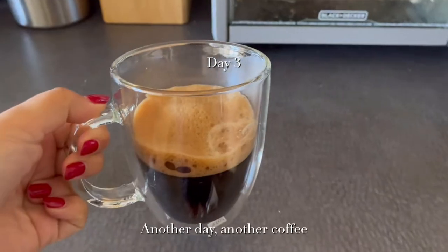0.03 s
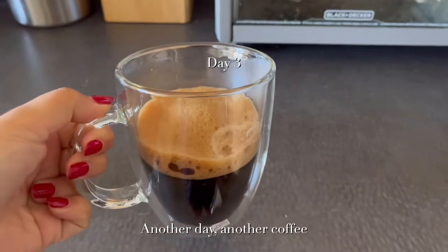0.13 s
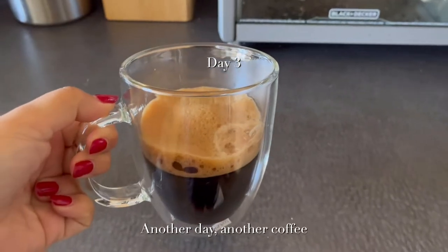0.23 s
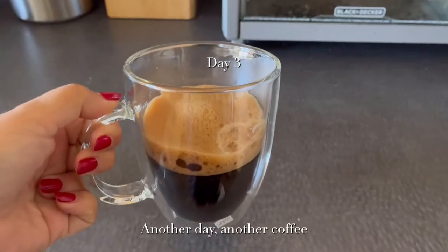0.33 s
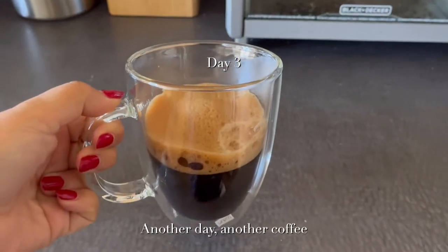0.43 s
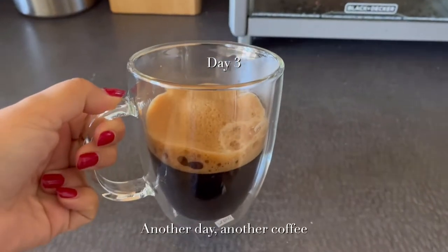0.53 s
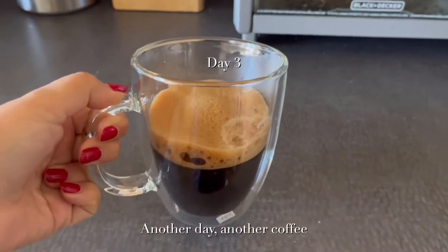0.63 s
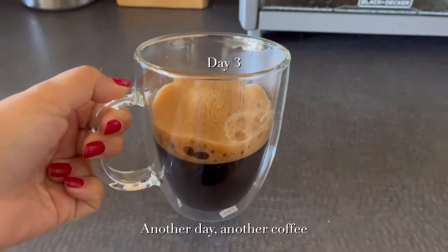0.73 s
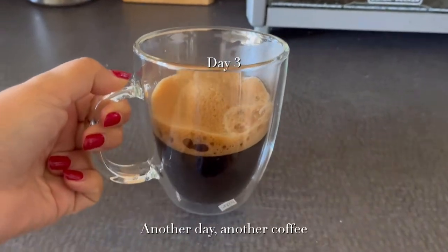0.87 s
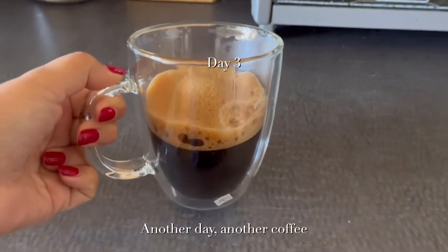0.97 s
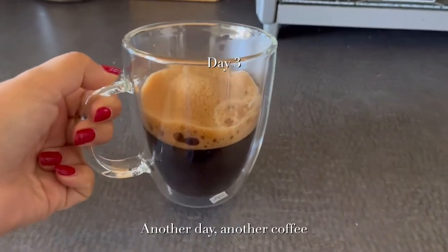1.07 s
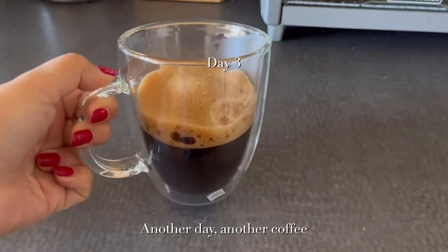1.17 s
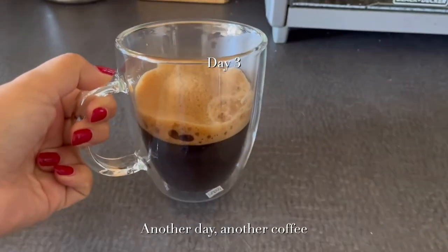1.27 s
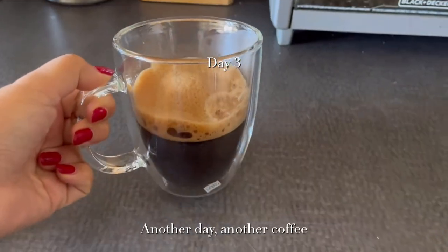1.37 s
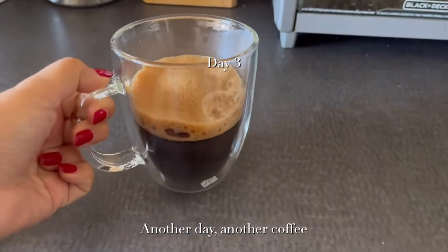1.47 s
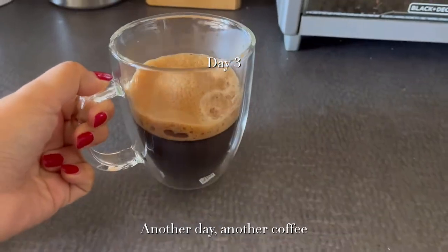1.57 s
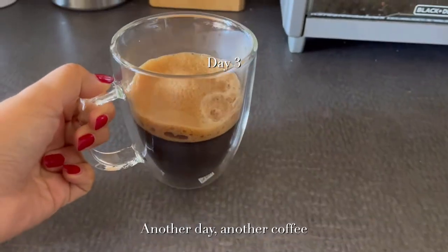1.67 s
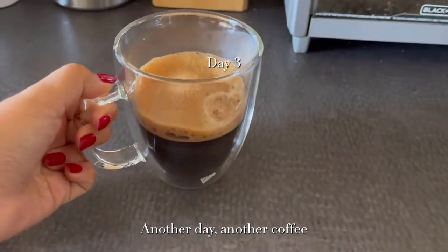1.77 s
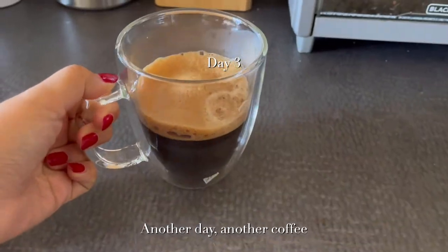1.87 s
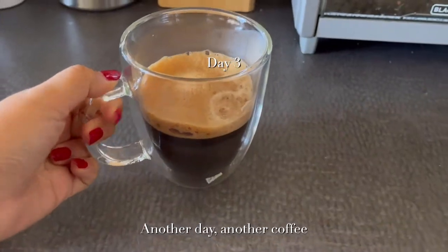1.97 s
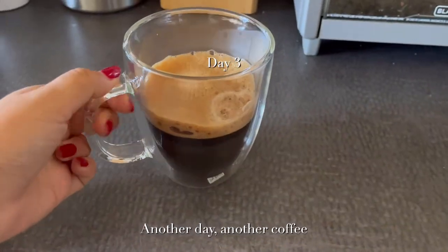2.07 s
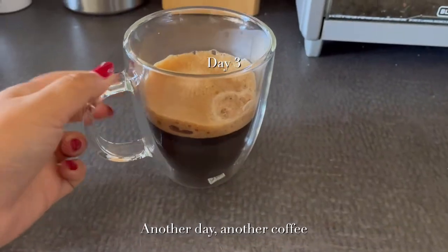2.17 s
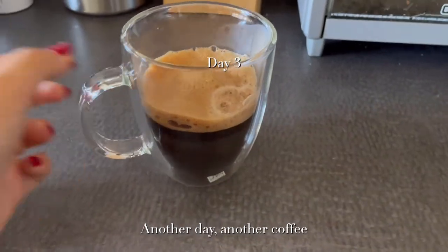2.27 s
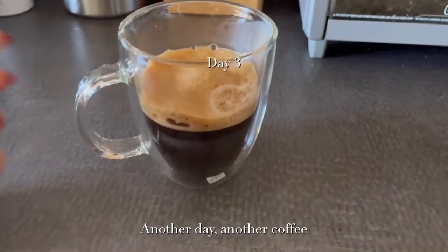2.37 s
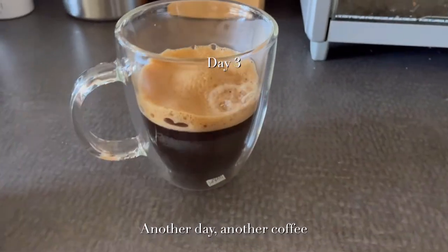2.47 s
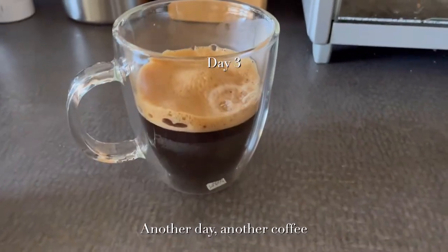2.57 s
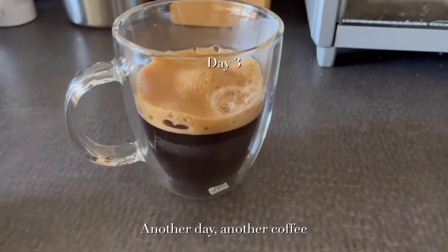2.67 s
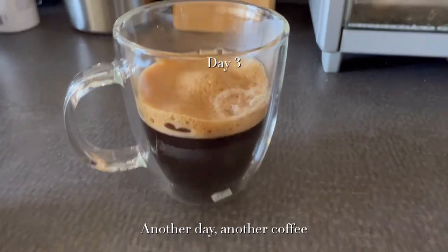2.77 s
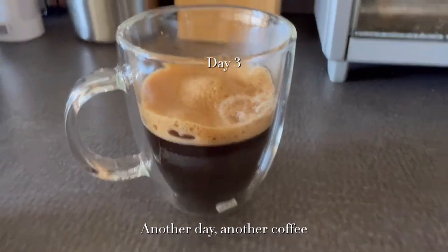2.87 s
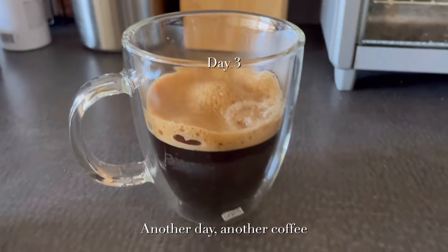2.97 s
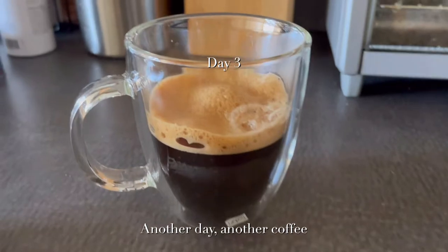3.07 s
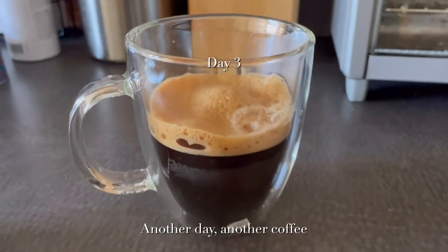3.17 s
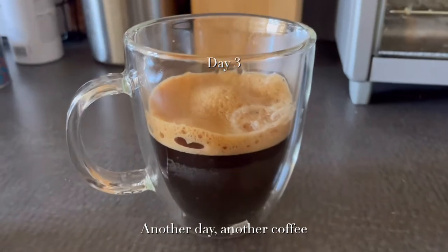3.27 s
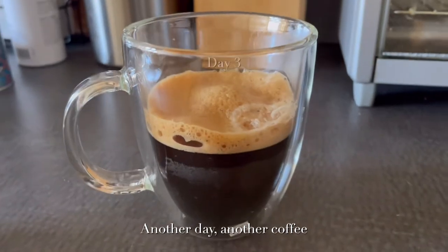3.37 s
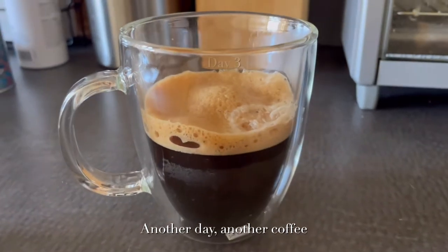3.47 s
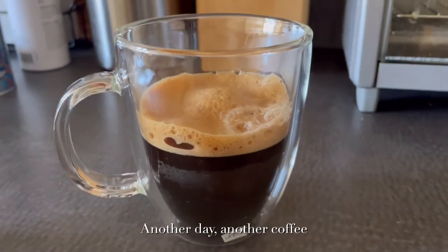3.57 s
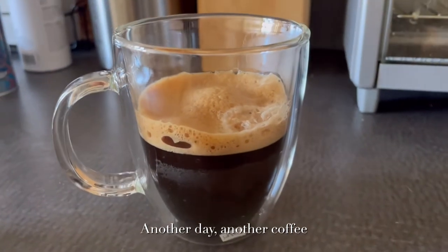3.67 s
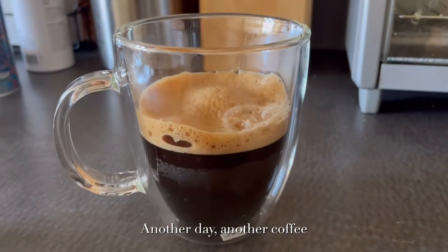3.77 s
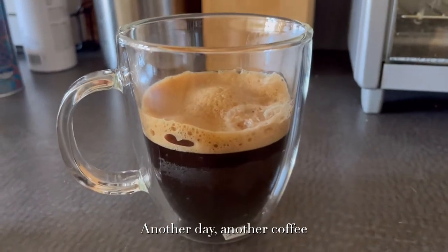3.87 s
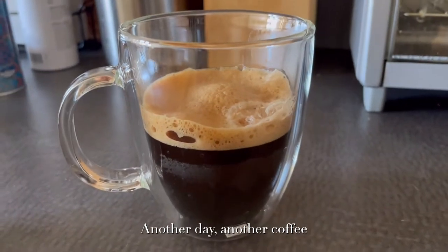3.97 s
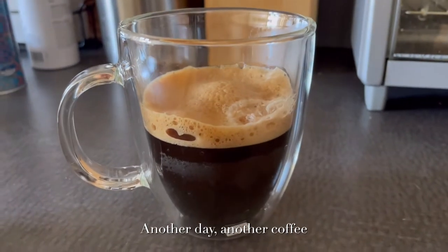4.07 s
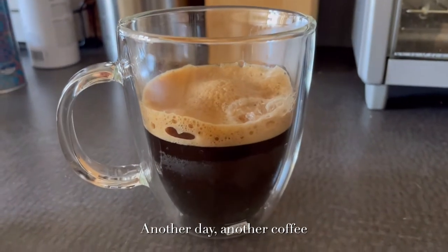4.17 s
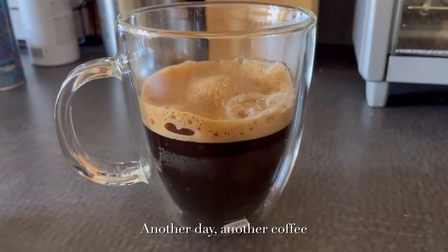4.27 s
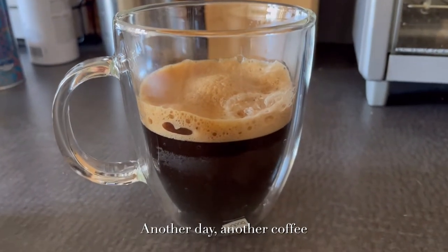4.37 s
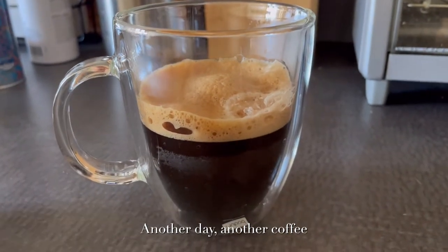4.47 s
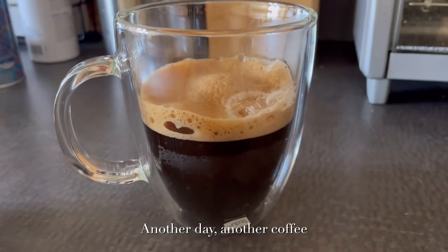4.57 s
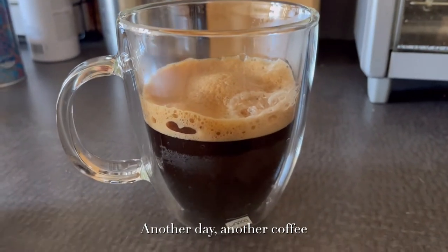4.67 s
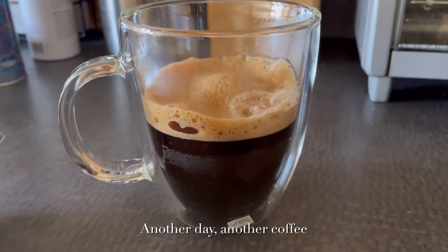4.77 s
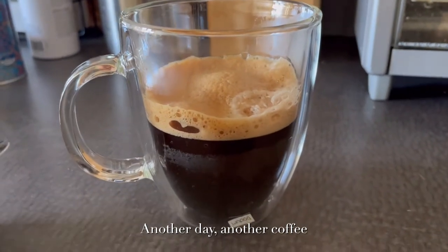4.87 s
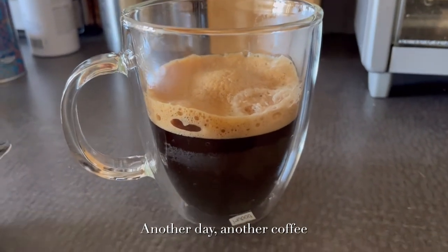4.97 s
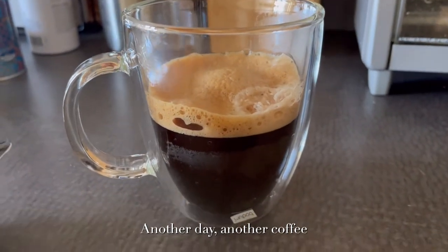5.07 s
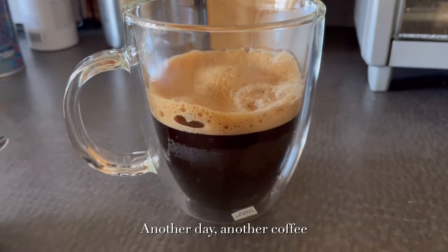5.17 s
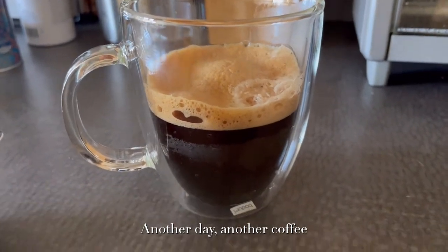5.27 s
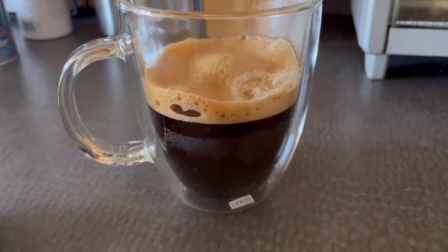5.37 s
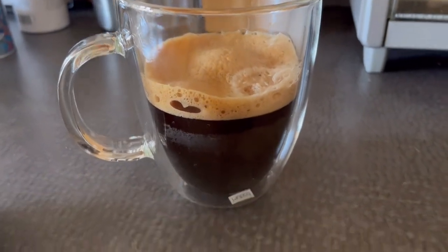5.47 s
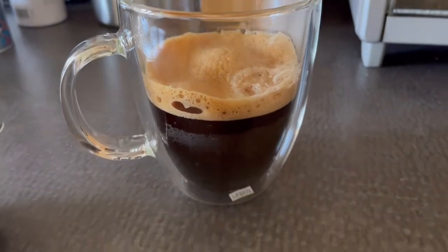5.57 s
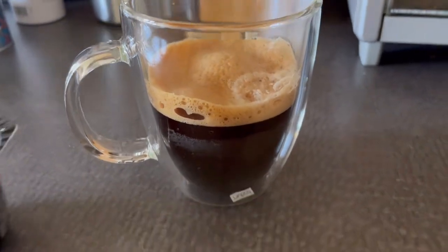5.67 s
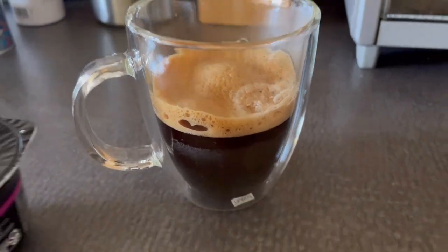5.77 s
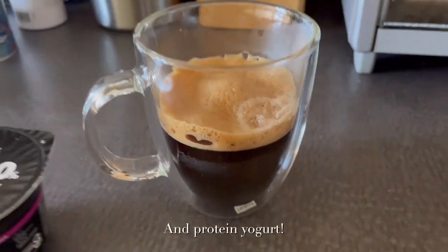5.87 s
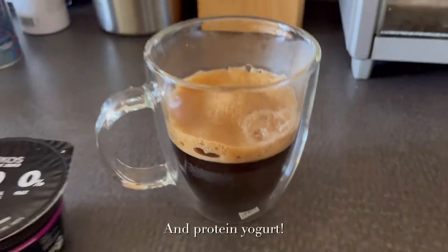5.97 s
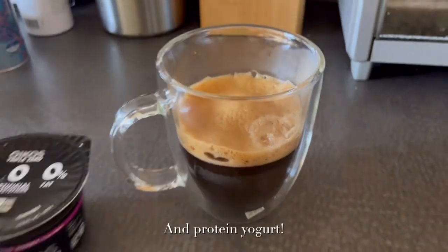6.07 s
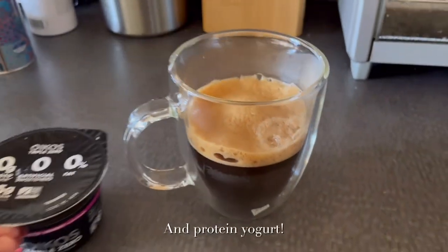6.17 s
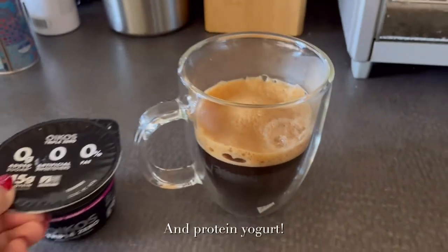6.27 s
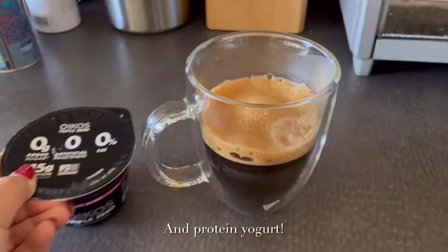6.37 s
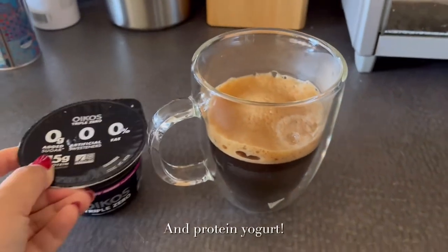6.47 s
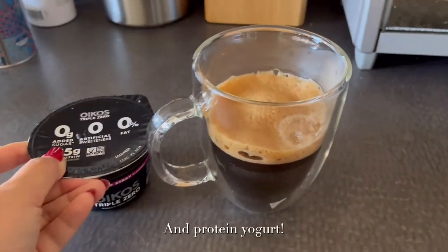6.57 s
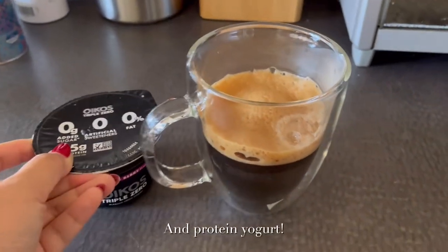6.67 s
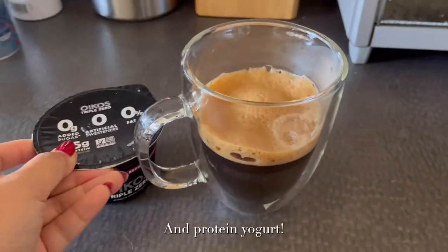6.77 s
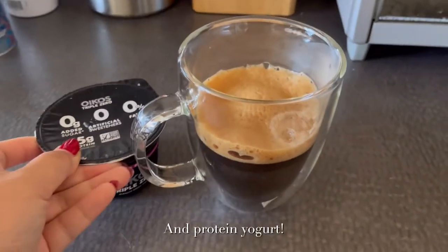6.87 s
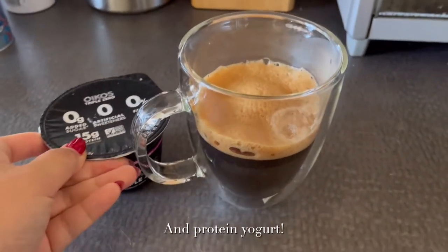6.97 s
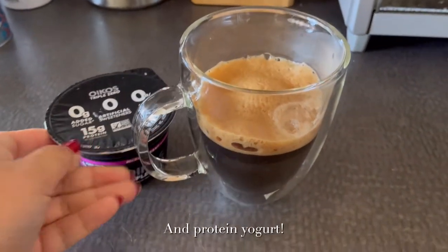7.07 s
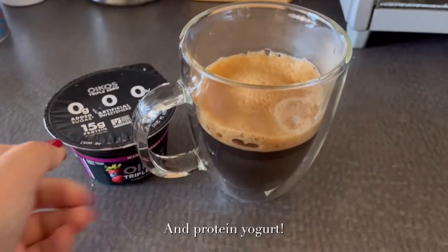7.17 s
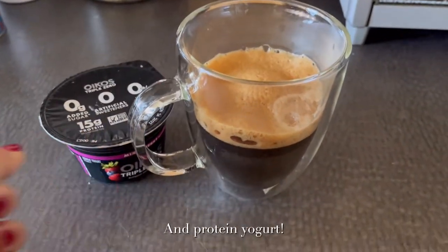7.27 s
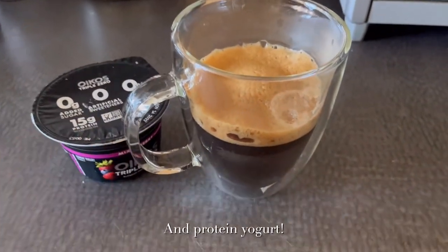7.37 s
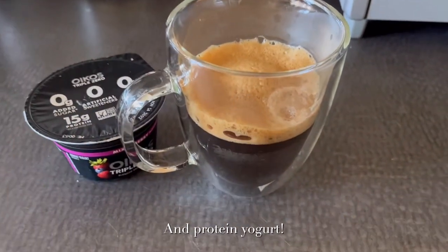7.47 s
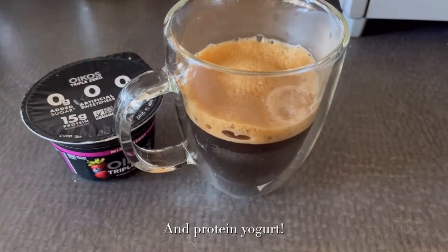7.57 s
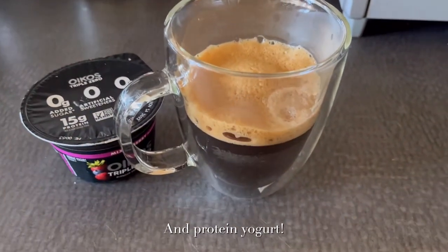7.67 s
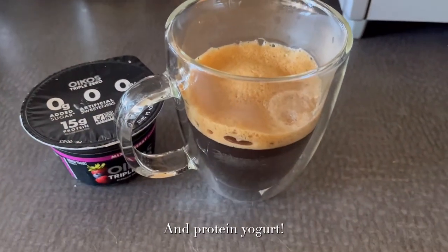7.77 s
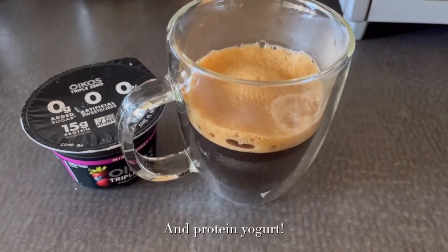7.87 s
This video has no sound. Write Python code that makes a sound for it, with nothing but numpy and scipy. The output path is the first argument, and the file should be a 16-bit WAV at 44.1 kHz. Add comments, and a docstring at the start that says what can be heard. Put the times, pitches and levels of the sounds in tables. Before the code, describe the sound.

Close up in a humming kitchen, a heavy glass clunks and scrapes over the counter, followed by hollow plastic taps and dry little scuffs.

```python
"""Mug and yogurt cup on a kitchen counter

A double-walled glass mug of coffee is set down close to a microphone pair, pushed over the textured counter
and let down flat; then a plastic yogurt cup comes up from the left, scuffing and tapping.
Glass, counter and cup are sets of dying sines; scrapes and scuffs are trains of tiny random slips, filtered.
A refrigerator hums as wavering sines over filtered noise, and a small, hard room answers the near sounds."""
import sys
import numpy as np
from scipy import signal
from scipy.fft import rfft, irfft
from scipy.io import wavfile
from scipy.ndimage import uniform_filter1d

SR = 44100
rng = np.random.default_rng(int(sys.argv[2]) if len(sys.argv) > 2 else 0)


def wav_out(sig):
    """Save sig, one row per channel (or a flat mono array), as 16-bit PCM at SR to the path in sys.argv[1]."""
    wavfile.write(sys.argv[1], SR, np.round(np.clip(np.atleast_2d(sig).T, -1, 1) * 32767).astype(np.int16))


N = 348719
TIME = np.arange(N) / SR  # s
RING = np.arange(SR // 2) / SR  # s, time axis of one short sound


def amp(db):
    """Decibels to gain."""
    return 10 ** (np.asarray(db) / 20)


def evened(x):
    """Scales to rms 1."""
    return x / np.sqrt(np.mean(x ** 2) + 1e-20)


def peaked(x):
    """Scales to peak 1."""
    return x / abs(x).max()


def read(points, hz):
    """Reads a spectrum table on a log-frequency axis."""
    f, value = np.transpose(points)
    return np.interp(np.log(hz + 1), np.log(f + 1), value)


def levels(rows):
    """Smoothed gain curves from rows of (t/s, level/dB, ..), silent outside them."""
    s, *columns = np.transpose(rows)
    curves = [amp(np.interp(TIME, s, column, left=-200, right=-200)) for column in columns]
    return [uniform_filter1d(curve, size=256).clip(0) for curve in curves]


def add(mix, s, sound):
    """Lays a stereo sound into the mix at time s."""
    part = mix[:, round(s * SR):][:, :sound.shape[-1]]
    part += sound[..., :part.shape[1]]


def cut(x, hz, kind, order=2):
    """Butterworth low-pass or high-pass."""
    return signal.sosfilt(signal.butter(order, min(hz, SR / 2 - 100), kind, fs=SR, output="sos"), x)


def through(x, response):
    """Plays a pair of signals through an impulse response."""
    return signal.oaconvolve(x, np.atleast_2d(response), axes=1)[:, :x.shape[1]]


def colour(x, spectrum):
    """Causal, minimum-phase filter with the given spectrum."""
    log_gain = np.log(amp(read(spectrum, abs(np.fft.fftfreq(4096, 1 / SR)))))
    taps = np.fft.ifft(np.exp(np.conj(signal.hilbert(log_gain)))).real
    return through(x, taps)


def widen(pair, side):
    """Turns two signals into mid and side of a left-right pair, the side filtered."""
    difference = colour(pair[1:], side)[0]
    return np.array([pair[0] + difference, pair[0] - difference])


def balance(left_db):
    """Gains that raise the left channel and lower the right one by left_db."""
    return amp([[left_db], [-left_db]])


def fall(t60):
    """Decay that drops 60 dB in t60 seconds, over the length of RING."""
    return np.exp(-np.log(1000) * RING / t60)


def ring(modes, low_db=0, low_hz=220, hold=1):
    """Dying sines of a struck body; low_db weights the modes under low_hz, hold scales their ring time."""
    return sum(amp(db + low_db * (hz < low_hz)) * np.sin(2 * np.pi * hz * RING) * fall(t60 * hold)
               for hz, db, t60 in modes)


def burst(decay):
    """A pair of noise puffs of energy 1 that fall to 1/e in decay seconds."""
    puff = rng.standard_normal((2, len(RING))) * np.exp(-RING / decay)
    return puff / np.linalg.norm(puff, axis=1, keepdims=True)


def grains(per_s, spread_db):
    """Two trains of tiny slips of random time, sign and size."""
    size = amp(spread_db * np.minimum(rng.exponential(1, (2, N)), 4))
    sign = rng.choice([-1, 1], (2, N))
    return evened(size * sign * (rng.random((2, N)) < per_s / SR))


def drift(per_s):
    """A slow random curve of rms 1, its rate limited by a Gaussian low-pass."""
    steps = np.linspace(0, TIME[-1], 4096)
    smooth = np.exp(-(np.fft.rfftfreq(len(steps), steps[1]) / per_s) ** 2)
    curve = irfft(rfft(rng.standard_normal(len(steps))) * smooth)
    return np.interp(TIME, steps, evened(curve))


def disperse(x, delay):
    """Bending waves in a slab or wall: treble runs ahead of bass; delay/s is the travel time at 400 Hz."""
    hz = np.fft.rfftfreq(len(x), 1 / SR)
    return irfft(rfft(x) * np.exp(-4j * np.pi * delay * np.sqrt(400 * hz)), len(x))


def resonate(x, hz, width_hz):
    """A steep resonance that follows the curve hz."""
    turn = np.exp(2j * np.pi * np.cumsum(hz) / SR)
    r = np.exp(-np.pi * width_hz / SR)
    return (turn * signal.lfilter([(1 - r) ** 2], [1, -2 * r, r * r], x / turn + 1e-18)).real


# ring time of the small, hard kitchen: f/Hz, t60/s
ROOM_T60 = [(100, 0.54), (400, 0.45), (1000, 0.6), (3000, 0.34), (7000, 0.27), (14000, 0.14)]


def kitchen(x, near_db, tail_db, near_decay=0.014):
    """Quick reflections from counter, wall and appliances, then the room's tail; the bass stays central."""
    hz, t, z = signal.stft(rng.standard_normal((2, len(RING))), SR, nperseg=256)
    dying = z * np.exp(-np.log(1000) * t / read(ROOM_T60, hz)[:, None])
    tail = signal.istft(dying, SR, nperseg=256)[1][:, :len(RING)]
    echoes = amp(tail_db) * tail / np.linalg.norm(tail[0]) + amp(near_db) * burst(near_decay)
    echoes = widen(echoes, [(100, -14.5), (300, -3.0), (800, 2.0)]) / np.sqrt(2)
    return x + through(x, np.pad(echoes, ((0, 0), (64, 0))))


# shape of the room's murmur: f/Hz, level/dB
AIR_SHAPE = [(15, -51), (25, -16.5), (50, -2), (95, 1), (153, -7.5), (236, -4), (305, -9), (490, -17),
             (1100, -32.5), (1225, -33), (1330, -34.5), (1480, -37), (2050, -48.5), (5500, -53.5),
             (8500, -66.5), (12500, -53.5), (14500, -63), (16000, -80.5)]
# stereo width of the murmur: f/Hz, side minus mid/dB
AIR_WIDTH = [(60, -18), (110, -15), (200, -11), (380, -2.5), (700, 2.5), (1290, -1), (2380, 1), (4400, -4),
             (8120, 7), (15000, -14)]
# steady lines of the refrigerator: f/Hz, rms level/dB
FRIDGE_LINES = [(59.2, -62.5), (236.9, -80), (296.1, -61), (716.0, -87), (1007, -79), (1184, -78),
                (1228, -82), (3440, -105)]


def room_tone(air_db=-52, waver=0.13, right_phase=0.45):
    """Background: filtered noise as air, with phase-wavering sines as the refrigerator."""
    air = amp(air_db) * evened(widen(colour(rng.standard_normal((2, N)), AIR_SHAPE), AIR_WIDTH))
    lead = np.array([[0], [right_phase]])  # rad between left and right at 300 Hz, in proportion elsewhere
    hum = sum(amp(db) * np.sin(2 * np.pi * hz * TIME + waver * drift(3.43) + lead * hz / 300)
              for hz, db in FRIDGE_LINES)
    return air + np.sqrt(2) * hum


# soft low bumps of handling: t/s, envelope peak/dB, f/Hz, swell time/s
HANDLING_BUMPS = [(3.338, -41.5, 55, 0.019), (5.589, -46.5, 58, 0.11), (5.915, -33.5, 84, .014),
                  (6.268, -60, 173, 0.0092), (7.122, -43.5, 110, 0.0081)]


def bumps():
    """Dull pushes: low sines that swell and die away."""
    out = np.zeros((2, N))
    for s, db, hz, swell in HANDLING_BUMPS:
        envelope = RING / swell * np.exp(1 - RING / swell)
        add(out, s, amp(db) * envelope * np.sin(2 * np.pi * hz * RING))
    return out


# the slab booms as the foot crosses its middle: t/s, rms level/dB, time from crest to 1/e on either side/s
BOOM_SWELLS = [(1.452, -36, 0.033), (1.663, -41.5, 0.015)]


def slab_boom(slab_hz=258, waver=0.79):
    """One resonance of the counter, kept going by the sliding foot: a phase-wavering sine."""
    gain = sum(amp(db) * np.exp(-((TIME - s) / half) ** 2) for s, db, half in BOOM_SWELLS)
    return gain * np.sqrt(2) * np.sin(2 * np.pi * slab_hz * TIME + waver * drift(12))


# fingernails leave the handle: t/s, brush peak/dB, tink above the brush/dB
NAIL_BRUSHES = [(1.957, -67.5, 4.5), (2.086, -56, 2.5), (2.134, -53, -15)]
# nail on glass: f/Hz, level/dB
NAIL_COLOUR = [(1500, -2), (3400, -13), (4300, -2), (5200, -8), (7000, -15), (8500, -31), (11000, 0),
               (14000, -6.5), (16000, -34)]
# the glass handle, damped by the fingers: f/Hz, level/dB, t60/s
HANDLE_MODES = [(4340, 0, 0.018), (5900, -6, 0.01), (6780, -10, 0.012)]


def nails(decay=0.011):
    """Light brushes of fingernails, as noise puffs, make the glass handle tink."""
    out = np.zeros((2, N))
    for s, db, tink_db in NAIL_BRUSHES:
        brush = peaked(colour(burst(decay), NAIL_COLOUR))
        add(out, s, amp(db) * (brush + amp(tink_db) * peaked(ring(HANDLE_MODES))))
    return kitchen(out, near_db=-3, tail_db=-9)


# the mug's glass: f/Hz, level/dB, t60/s
GLASS_MODES = [(1451, -11, 0.17), (1520, -6, 0.029), (1886, -7.5, .05), (2114, -1.5, 0.024),
               (2650, -2.5, 0.029), (3154, -21, 0.011), (3490, -10, 0.022), (3634, -1, 0.027),
               (3650, -5, 0.024), (5460, -14.5, 0.019), (6800, -9, 0.02), (6725, -0.5, 0.031)]
ROLL_DB, ROLL_PER_S = 2.5, 25  # swelling and fading of each mode as the contact travels round the foot
ROLL_DETUNE = 0.013  # the travelling contact also pulls each mode off pitch by this rms share


def glass_chatter(catches, sliding):
    """Catches of the foot ring the glass; its modes shift in strength and pitch as the contact travels."""
    out = np.zeros((2, N))
    for hz, db, t60 in GLASS_MODES:
        mode_hz = hz * (1 + ROLL_DETUNE * drift(ROLL_PER_S)[sliding])
        turn = np.exp(2j * np.pi * np.cumsum(mode_hz) / SR)
        drive = catches[:, sliding] * amp(db + ROLL_DB * drift(ROLL_PER_S)[sliding])
        decay = np.exp(-np.log(1000) / (t60 * SR))
        out[:, sliding] += (turn * signal.lfilter([1], [1, -decay], drive / turn)).imag
    return out


# one push slides the mug: t/s, scrape level before the layer trims/dB
MUG_PUSH = [(1.215, -67.5), (1.25, -65.5), (1.31, -62), (1.345, -53), (1.385, -50.5), (1.606, -56.5),
            (1.654, -71), (1.755, -74.5), (1.79, -72)]
# counter shaken by the foot: f/Hz, level/dB
RUMBLE_SHAPE = [(26, -41.5), (45, -9), (119, -0.5), (226, -1), (258, 6), (286, -5.5), (321, 0.5),
                (431, 0.5), (537, -11.5), (631, -24), (710, -18), (938, -24), (1190, -59), (1500, -27.5),
                (1950, -76.5), (3300, -120)]
# fine grit under the foot: f/Hz, level/dB
GRIT_SHAPE = [(700, 12), (1300, 1.5), (2300, -2.5), (3200, -1.5), (3900, -1), (4600, -19), (5400, -8.5),
              (6300, -3.5), (7400, -29), (8200, -37), (10500, -9.5), (14000, -26), (16000, -47)]
# stereo width of rumble and grit: f/Hz, side minus mid/dB
MUG_WIDTH = [(60, -34), (110, -24.5), (200, -9), (380, -28.5), (700, -4), (1290, 7), (2380, -1), (4400, -3),
             (8120, -3), (15000, 5)]
RUMBLE_FOLLOWS, GRIT_FOLLOWS = 0.57, 0.74  # dB of rumble and of grit per dB of scrape
RUMBLE_FADE_DB_PER_S = 16  # the counter shakes less as the mug moves off
SLOW_RIDGES_HZ, FAST_RIDGES_HZ = 77.9, 196  # texture ridges under the foot, before and after it speeds up
SPEED_UP_AT_S, SPEED_UP_S = 1.375, 0.11
CHATTER_DB = 4.2  # the foot's catches come in clumps


def mug_slide(ridge_db=-7, rumble_db=-1, glass_db=2.0, grit_db=-12.0, wander=0.0298, left_db=1.5, grip=0.41):
    """The foot bumps over ridges that shake the counter; fine grit hisses, coarser catches ring the glass."""
    push, = levels(MUG_PUSH)
    start, end = MUG_PUSH[0][0], MUG_PUSH[-1][0]
    rumble_gain = push ** RUMBLE_FOLLOWS * amp(-RUMBLE_FADE_DB_PER_S * np.maximum(TIME - start, 0))

    speed = .5 + .5 * np.tanh((TIME - SPEED_UP_AT_S) / SPEED_UP_S)
    ridge_hz = SLOW_RIDGES_HZ + (FAST_RIDGES_HZ - SLOW_RIDGES_HZ) * speed
    turns = np.cumsum(ridge_hz * (1 + wander * drift(25))) / SR
    ridges = evened(sum(np.cos(2 * np.pi * k * turns) / k for k in range(1, 4)))
    rumble = evened(widen(colour(grains(900, spread_db=-3.0), RUMBLE_SHAPE), MUG_WIDTH))
    shaking = rumble_gain * (amp(rumble_db) * rumble + amp(ridge_db) * ridges)

    pressure = 1 + grip * np.cos(2 * np.pi * turns)  # each ridge presses the foot
    catches = grains(420, spread_db=2) * amp(CHATTER_DB * drift(100)) * pressure
    sliding = (TIME > start) & (TIME < end)
    glass = cut(cut(glass_chatter(catches, sliding), 1400, "high"), 6800, "low", order=6)
    glass = evened(glass) * np.sqrt(sliding.mean())  # rms 1 while sliding
    slips = grains(4100, spread_db=0.5) * pressure * amp(2.6 * drift(70))
    grit = evened(widen(colour(slips, GRIT_SHAPE), MUG_WIDTH))
    scrape = amp(glass_db) * push * glass + amp(grit_db) * push ** GRIT_FOLLOWS * grit
    return kitchen(scrape * balance(left_db) + shaking, near_db=-4.5, tail_db=-10.5)


# the foot sticks and slips free, most of all while still slow: t/s, peak before the trim/dB
FOOT_SLIPS = [(1.2206, -44), (1.2575, -51), (1.2644, -49), (1.2804, -50), (1.2865, -40), (1.2964, -41),
              (1.3094, -36.5), (1.3244, -44), (1.3444, -46), (1.3633, -54), (1.3748, -32.5), (1.3904, -39),
              (1.5673, -40), (1.7439, -66)]
# the counter slab and the cabinet under it: f/Hz, level/dB, t60/s
COUNTER_MODES = [(85, -5.5, .2), (108, -6, .13), (129, -12, .12), (199, -16, .13), (232, -18, .13),
                 (260, -8, .14), (322, -8, .06), (355, -0.5, .055), (386, 2, .07), (435, -4, .035),
                 (526, -13, .09), (690, -11, .05), (770, -15, .04), (918, -20, .06)]


def mug_catches(catch_db=-1, crack_db=-5, jolt_db=3, travel=0.00474):
    """Each slip of the foot pings the glass and jolts the counter."""
    out = np.zeros((2, N))
    jolt = peaked(disperse(cut(ring(COUNTER_MODES), 180, "high"), travel))
    for s, db in FOOT_SLIPS:
        crack = peaked(colour(burst(0.0015), GRIT_SHAPE))
        ping = peaked(cut(peaked(ring(GLASS_MODES)) + amp(crack_db) * crack, 7200, "low", order=7))
        add(out, s, amp(db + catch_db) * (ping + amp(jolt_db) * jolt))
    return kitchen(out, near_db=-11, tail_db=-8)


# the mug's foot meets the counter: t/s, clink level before left-right balance/dB, thud peak/dB,
# clink low-pass f/Hz, weight on the lowest counter modes/dB,
# share of ring time left to the glass (little once it stands flat)
FOOT_KNOCKS = [(1.0981, -28, -10.5, 12000, 5, 1), (1.1984, -33, -16.5, 10900, 6.5, 1),
               (1.8008, -35.5, -17.5, 1500, -0.5, .2), (1.864, -60, -36, 1100, -11, .2)]
# glass on laminate: f/Hz, level/dB
CRACK_COLOUR = [(200, -55.5), (600, 14.5), (1200, 13), (2400, 7.5), (4000, -6), (5200, -6), (7000, -54),
                (9000, -17), (15000, -11.5)]


def mug_knocks(crack_db=-2, crack_decay=0.0041, travel=0.00451, thud_hz=750, left_db=2):
    """The rim touches and clinks; the blow runs through the counter and arrives as a thud."""
    clinks, thuds = np.zeros((2, 2, N))
    for s, clink_db, thud_db, bright_hz, low_db, hold in FOOT_KNOCKS:
        crack = peaked(colour(burst(crack_decay), CRACK_COLOUR))
        clink = peaked(ring(GLASS_MODES, hold=hold)) + amp(crack_db) * crack
        clink = peaked(cut(clink, bright_hz, "low"))
        add(clinks, s, amp(clink_db) * clink * balance(left_db))
        thud = cut(cut(ring(COUNTER_MODES, low_db), thud_hz, "low"), 120, "high")
        add(thuds, s, amp(thud_db) * peaked(disperse(thud, travel)))
    return kitchen(clinks, near_db=-29.5, tail_db=-11.0) + kitchen(thuds, near_db=-4.5, tail_db=-11.5)


SHOVE_ATTACK_S, SHOVE_RELEASE_S = 0.04, 0.044  # longest attack and the release, as time constants
JERK_SHARE = 0.33  # a short shove is a jerk: its attack takes at most this share of its length


def shove(start, length):
    """Attack, hold and release of one movement of cup or hand."""
    early = np.maximum(start - TIME, 0)
    late = np.maximum(TIME - start - length, 0)
    attack = min(SHOVE_ATTACK_S, JERK_SHARE * length)
    return np.exp(-np.minimum(early / attack + late / SHOVE_RELEASE_S, 20))


# fingertips slide off the cup: start t/s, length/s, level/dB
HAND_LEAVES = [(7.15, 0.04, -64), (7.456, 0.13, -82.5)]
# skin on plastic: f/Hz, level/dB
SKIN_COLOUR = [(1500, -30), (3000, -1), (4700, 3), (6200, -6), (8000, -26), (16000, -41)]


def finger_slips():
    """A soft, broad hiss of dense slips as the hand lets go."""
    gain = sum(amp(db) * shove(start, length) for start, length, db in HAND_LEAVES)
    return gain * evened(colour(grains(6000, spread_db=-2), SKIN_COLOUR))


# short shoves of the cup, the grip tuning its wall: start t/s, length/s, scuff level before the layer trims/dB,
# fizz above the scuff/dB, weight on the hollow low part/dB, wall resonance f/Hz, resonance above the scuff/dB
SHOVES = [(3.918, 0.016, -57, -13.5, -16.5, 1926, -7), (3.986, 0.015, -68, -12, -15, 2306, -9),
          (4.074, 0.018, -74.5, -22, -7, 2044, 7.5), (4.13, 0.067, -71.5, -9, -2, 2174, -7),
          (4.222, 0.08, -59.5, -8, 0, 2180, -6.5), (4.375, 0.15, -61, -6.5, 0.5, 2100, -9),
          (4.67, 0.05, -64, -9.5, 0, 3080, -9), (4.735, 0.095, -57.5, -6.5, 5, 2156, -7),
          (4.887, 0.024, -67, -5, -5, 3070, -8.5), (5.925, 0.034, -61.5, -11.5, 5, 1700, -7),
          (5.985, .19, -59, -11, -3, 3100, -9), (6.24, 0.061, -65, -10.5, -4, 3100, -13.5),
          (6.36, 0.092, -76, -27, 2, 2860, 2.5), (6.49, 0.012, -62.5, -15, 2, 2400, -4.5),
          (6.58, 0.07, -60.5, -12.5, 2, 2245, -3), (6.72, 0.13, -62.5, -12.5, 2.5, 2546, -6),
          (6.95, 0.065, -60, -9, -2, 2885, -13.5), (7.056, 0.02, -55.5, -13.5, -7, 2123, -6.5),
          (7.135, 0.031, -56, -20, 2.5, 1341, -8.5), (7.46, 0.13, -88, 6, -3.5, 3080, -13.5)]
# between the last shoves the cup keeps creeping along: one row, same columns
CREEP = (6.0, 1.2, -72.5, -29, -3, 3300, -15)
# base rubbing the counter: f/Hz, level/dB
SCUFF_COLOUR = [(350, -13.5), (600, -4), (850, 7.5), (1300, -5), (1700, 1.5), (2150, 3), (2600, -0.5),
                (3100, -1), (4000, -13.5), (5500, -16), (7200, -16.5), (9000, -50)]
# fine fizz of the rub: f/Hz, level/dB
FIZZ_COLOUR = [(4000, -15), (7000, -25.5), (8500, -28.5), (10000, 2), (12500, -2), (14200, -5),
               (16000, -33)]
# snap of thin plastic, and of foil: f/Hz, level/dB
SNAP_COLOUR = [(150, -11.5), (500, -1.5), (900, 9.5), (1300, -1.5), (2200, 6.5), (4000, -0.5), (6500, -1.5),
               (9000, -20), (12000, -3), (14000, -15), (16000, -27.5)]
# stereo width of the drag: f/Hz, side minus mid/dB
CUP_WIDTH = [(300, -10), (800, -2.5), (1300, 9), (2200, -12), (3200, -1.5), (4500, 1.5), (7000, 4),
             (8500, -5), (10000, -0.5), (12000, -6.5), (15000, 3)]
FOIL_PER_S, FOIL_DB, FOIL_HZ = 90, -6.5, 6000  # lid crackles: rate, level against the fizz gain, high-pass
HOLLOW_HZ = 1500  # the cup's cavity speaks below this
STUTTER_DB, STUTTER_PER_S = 1.8, 70  # the base grips and lets go
WALL_WIDTH_SHARE, WALL_WANDER = 0.2, 0.017  # the wall's broad resonance wanders as the fingers shift


def cup_drags(scuff_db=-1, fizz_db=-1, wall_db=-0.5, left_db=1.0):
    """The plastic base rubs in dense slips: hollow scuff, ringing wall, fine fizz; the foil lid crackles."""
    gains = np.zeros((4, N))
    wall_hz = np.full(N, float(SHOVES[0][5]))
    for start, length, db, bright_db, hollow_db, hz, ring_db in SHOVES + [CREEP]:
        gain = amp([[db], [db + bright_db], [db + hollow_db], [db + ring_db]]) * shove(start, length)
        wall_hz[gain[3] > gains[3]] = hz  # the loudest movement tunes the wall
        gains = np.maximum(gains, gain)
    scuff_gain, fizz_gain, hollow_gain, wall_gain = gains

    stutter = amp(STUTTER_DB * drift(STUTTER_PER_S))
    slips = grains(3500, spread_db=2.5) * stutter
    rub = evened(widen(colour(slips, SCUFF_COLOUR), CUP_WIDTH))
    scuff = scuff_gain * cut(rub, HOLLOW_HZ, "high", order=3)
    scuff = amp(scuff_db) * (scuff + hollow_gain * cut(rub, HOLLOW_HZ, "low", order=3))
    wandering_hz = wall_hz * (1 + WALL_WANDER * drift(13))
    wall = resonate(grains(3000, spread_db=0.5) * stutter, wandering_hz, WALL_WIDTH_SHARE * wall_hz.mean())
    wall = amp(wall_db) * wall_gain * evened(widen(wall, CUP_WIDTH))
    fizz = amp(fizz_db) * fizz_gain * evened(widen(colour(slips, FIZZ_COLOUR), CUP_WIDTH))
    snaps = colour(through(grains(FOIL_PER_S, spread_db=-0.5), burst(0.0012)), SNAP_COLOUR)
    foil = amp(FOIL_DB) * fizz_gain * evened(widen(cut(snaps, FOIL_HZ, "high"), CUP_WIDTH))
    return kitchen((scuff + wall) * balance(left_db) + fizz + foil, near_db=-5, tail_db=-12.5)


# the full cup's base comes down on the counter: t/s, peak/dB
BASE_LANDINGS = [(6.26, -34.5), (6.326, -50)]
# the base, damped by the yogurt: f/Hz, level/dB, t60/s
BASE_MODES = [(205, -14, 0.09), (284, 2, 0.031), (410, 6.5, 0.021), (490, -3, 0.015), (593, -4, 0.014),
              (810, 2, 0.009), (1030, -7, 0.013), (1230, -15, 0.02)]


def cup_landings(soft_hz=1400, travel=0.0091):
    """The heavy base lands with a dull plop that falls in pitch as it crosses the counter."""
    out = np.zeros((2, N))
    for s, db in BASE_LANDINGS:
        plop = disperse(cut(ring(BASE_MODES), soft_hz, "low", order=4), travel)
        add(out, s, amp(db) * peaked(plop))
    return kitchen(out, near_db=-19, tail_db=-3.0)


# the plastic cup taps: t/s, peak/dB, high-pass f/Hz, low-pass f of the ring/Hz, weight on the hollow modes/dB,
# weight on the snap/dB, note f of the struck patch of wall/Hz, its weight/dB
TAPS = [(3.918, -40.5, 1250, 3100, -23, -4, 1920, -13), (4.016, -50.5, 2500, 7000, -10, 5, 5300, -12),
        (4.355, -49, 5000, 9000, -8, -2, 6500, -6), (4.622, -55, 2480, 6000, -10, 1, 3080, -11.5),
        (4.8287, -10, 430, 8500, 0, -10, 2060, -17), (4.9337, -44, 2010, 9100, 1, 5, 3200, -14),
        (5.072, -52.5, 1800, 11950, -3.5, 2, 2800, -6), (5.9087, -39.5, 1280, 6300, 8.5, -9, 1680, -12),
        (6.0935, -18, 1500, 5360, -5.5, -0.5, 2026, -11), (6.49, -49, 700, 2900, -5, -11, 2520, -14),
        (6.657, -30.5, 634, 3200, -5, -5.5, 2420, -6.5), (6.9974, -42.5, 1750, 3270, -8, -10, 2630, -14),
        (7.059, -43.5, 1700, 2500, 0, -1, 2050, -2), (7.069, -46, 1800, 9000, -5, 3, 7530, -8),
        (7.121, -34, 796, 4770, -8, -6, 1670, -18), (7.138, -37.5, 650, 5000, 0, -15, 1160, -11),
        (7.16, -39, 700, 5200, 0, -13, 1330, -5), (7.19, -51.5, 700, 6000, 8, -2, 1500, -12)]
# the full cup and its foil lid: f/Hz, level/dB, t60/s
CUP_MODES = [(570, -8, .02), (657, -3.5, .032), (797, -2.5, .053), (985, -3, .044), (1235, -11.5, .035),
             (1520, -11, .028), (1660, -9.5, .05), (1950, -9, .025), (2080, -7, .028), (2280, -15, .025),
             (2680, -14, .02), (3187, -9, .03), (3350, -19, .04), (3650, -11, .015), (3870, -8, .016),
             (4200, -12, .02), (5250, -21, .025), (6400, -13, .012), (7900, -11, .007)]
# the cup comes in from the left: t/s, left-right level/dB, lag of the right channel/ms
APPROACH = [(3.92, 6, 0.69), (4.828, 2, 0.28), (6.089, 0, 0.022), (6.66, 0.5, .05), (7.16, 1, .05)]
# shading of the far microphone: f/Hz, share of the left-right dB
FAR_SHADE = [(200, -3.5), (650, 6.5), (1000, 5.5), (1600, 0), (2100, 3.5), (3200, 1.8), (4000, 5.5),
             (5500, 1), (8000, 3)]
PATCH_T60_S = 0.021  # ring time of the struck patch of wall


def cup_taps(spread_s=0.0009, snap_decay=0.0035, echo_db=-13, wall_s=.00615):
    """A snap of thin plastic and the short ring of the cup; the contact decides which modes speak."""
    rings, snaps = np.zeros((2, 2, N))
    path_s, *path = np.transpose(APPROACH)
    for s, db, low_hz, high_hz, hollow_db, snap_db, patch_hz, patch_db in TAPS:
        pan_db, lag_ms = (np.interp(s, path_s, column) for column in path)
        body = cut(ring(CUP_MODES, hollow_db, low_hz=1200), high_hz, "low", order=4)
        body = body / abs(ring(CUP_MODES)).max() + ring([(patch_hz, patch_db, PATCH_T60_S)])
        body = disperse(body, spread_s)  # the hollow modes bloom just after the snap
        snap = peaked(colour(burst(snap_decay), SNAP_COLOUR))
        snap = amp(snap_db) * cut(snap, 2 * high_hz, "low", order=1)
        parts = cut(np.array([[body, body], snap]), low_hz, "high", order=3)
        parts = amp(db) * parts / abs(parts.sum(0)).max()
        shade = [(hz, -share * pan_db) for hz, share in FAR_SHADE]
        lag = round(abs(lag_ms) * SR / 1000)
        for out, tap in zip((rings, snaps), parts):
            right = np.pad(colour(tap[1:], shade)[0], (lag, 0))[:len(RING)]
            add(out, s, np.array([tap[0], right]))
            add(out, s + wall_s, amp(echo_db) * cut(tap, 6400, "low"))  # back from the wall behind the counter
    rings = kitchen(rings, near_db=-14, tail_db=-20, near_decay=0.0095)
    return rings + kitchen(snaps, near_db=-15, tail_db=-13.5)


# stereo width of the near sounds in the treble, wide around 8-9 kHz and narrow around 12 kHz:
# f/Hz, weight on the side/dB
TREBLE_WIDTH = [(6500, -1.5), (7400, 6.5), (8300, 10.5), (9000, 16.5), (10000, 0), (11000, -6.5),
                (12000, -16.5), (13000, -0.5), (14000, 0), (15500, 6.5)]


def near_width(pair):
    """Weights the left-right difference of the near sounds by frequency."""
    left, right = pair
    return widen(np.array([left + right, left - right]) / 2, TREBLE_WIDTH)


def scene():
    """Kitchen, mug and cup together."""
    background = room_tone() + bumps()
    mug = slab_boom() + nails() + mug_slide() + mug_catches() + mug_knocks()
    cup = finger_slips() + cup_drags() + cup_landings() + cup_taps()
    return background + near_width(mug + cup)


def record(dry, edge_hz=16300):
    """The recorder's band limit, a steep low-pass."""
    return signal.oaconvolve(dry, signal.firwin(255, edge_hz, window=("kaiser", 9), fs=SR)[None], "same")


dry = scene()
out = record(dry)
wav_out(out)
```